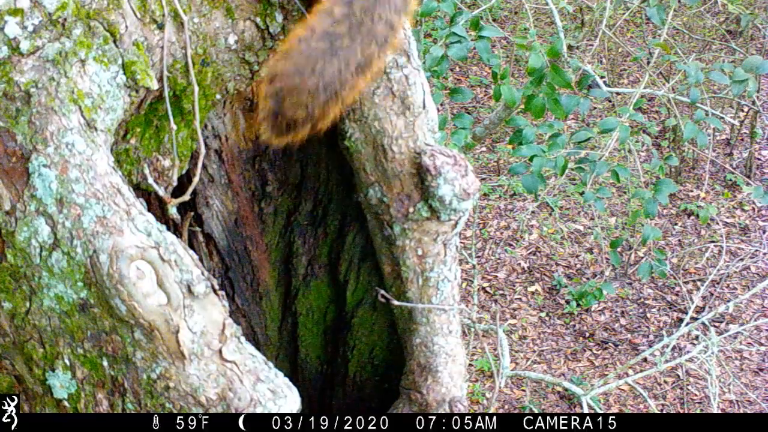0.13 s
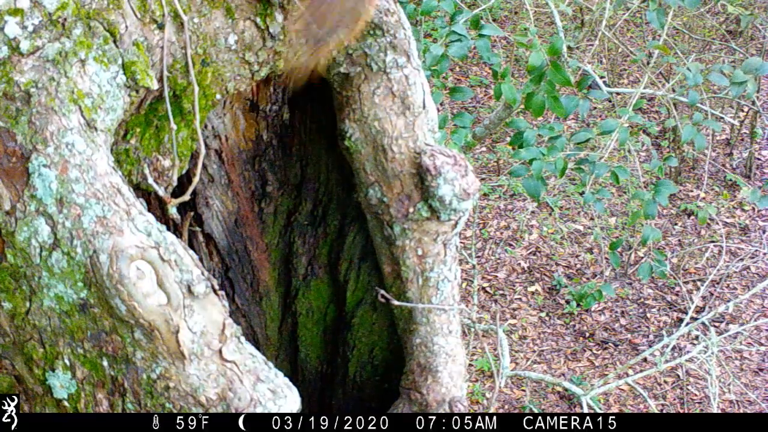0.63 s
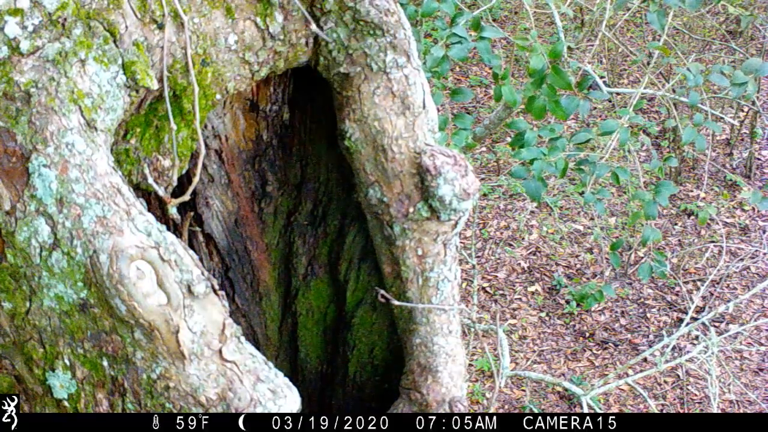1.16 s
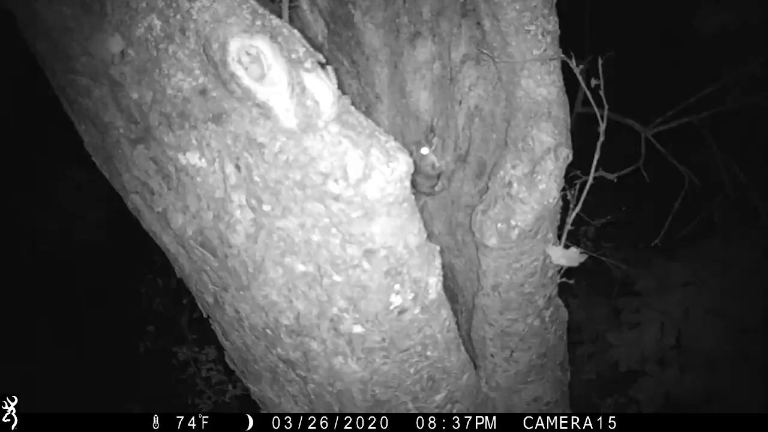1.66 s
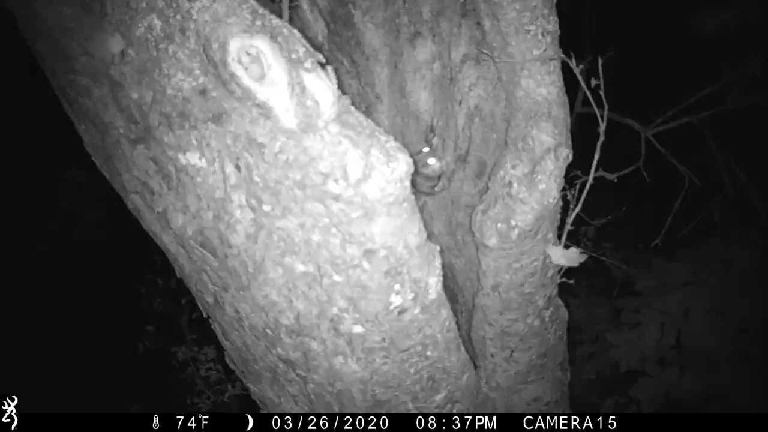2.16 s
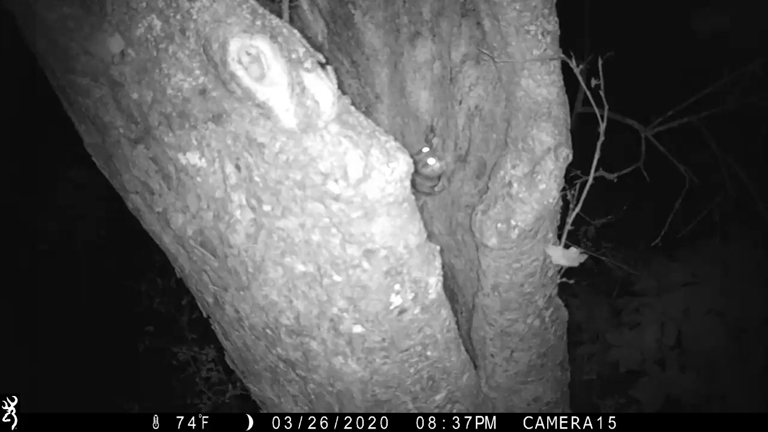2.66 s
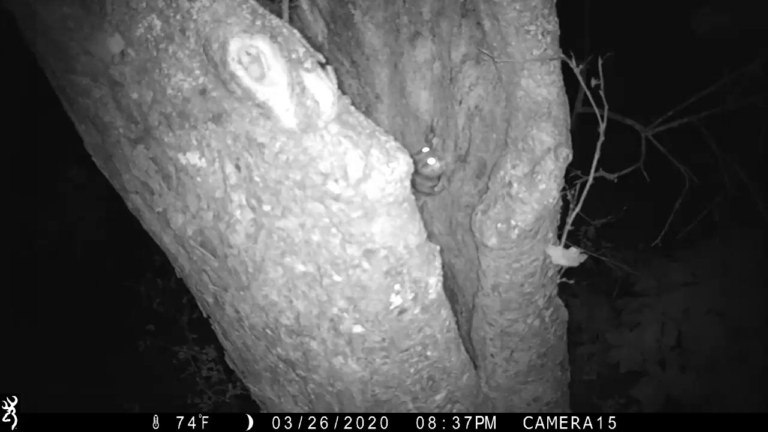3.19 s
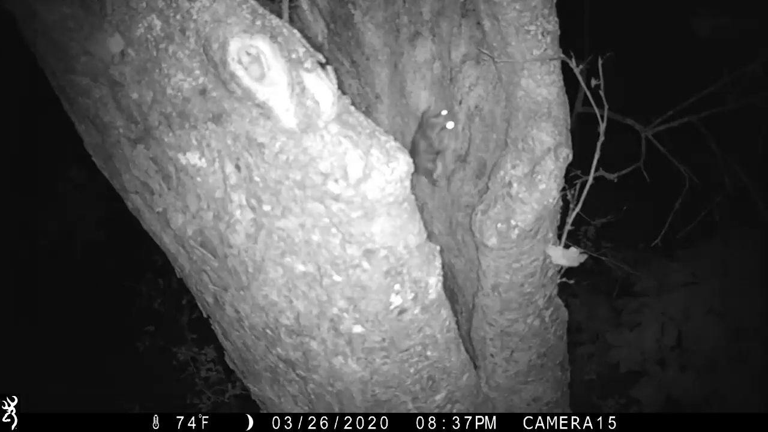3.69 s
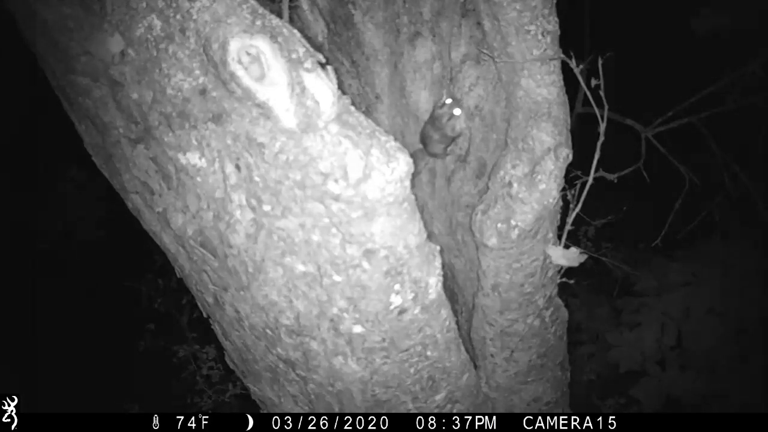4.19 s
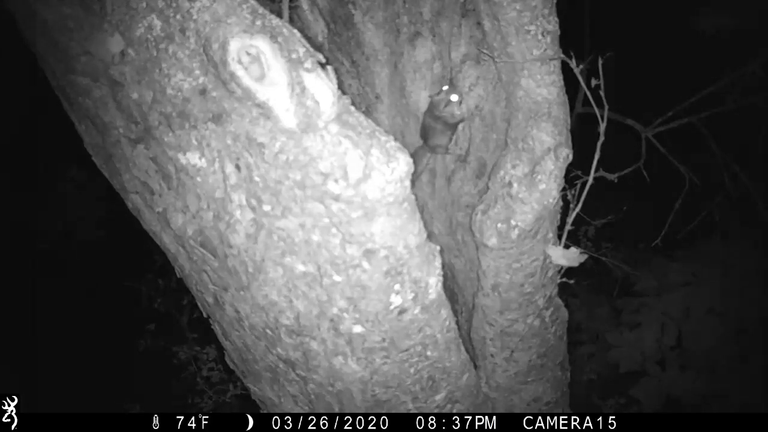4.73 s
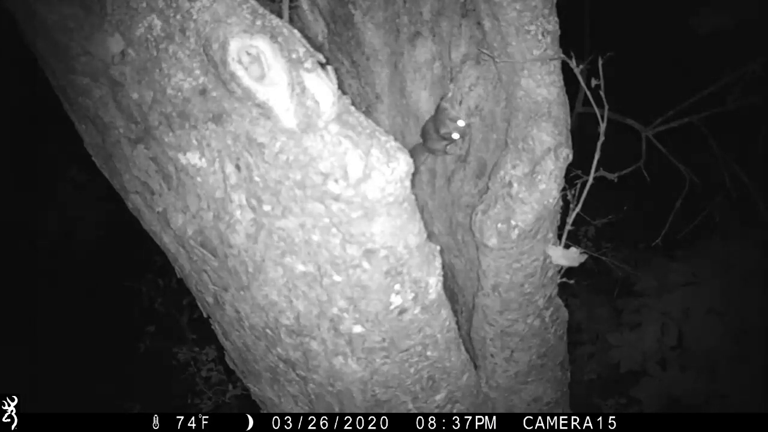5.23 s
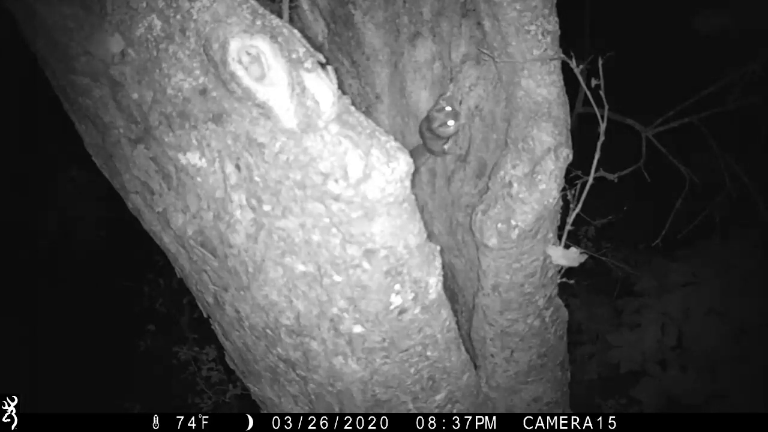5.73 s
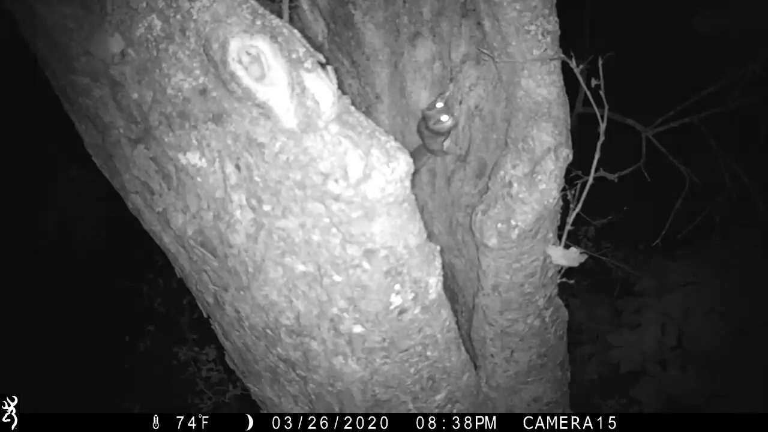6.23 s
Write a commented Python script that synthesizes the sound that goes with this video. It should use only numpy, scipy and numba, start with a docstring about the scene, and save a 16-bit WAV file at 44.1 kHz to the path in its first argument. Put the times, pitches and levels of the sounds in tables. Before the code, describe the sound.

A microphone fixed by a hollow tree picks up crisp claw ticks, woody knocks and one sharp jolt, with small bird whistles and a lone ticking insect behind a quiet buzzing chorus. The scene cuts hard to night: a piercing, steady, trembling cricket drone dominates, masking faint road noise and a distant passing vehicle, with small hollow knocks late on.

```python
"""Morning and night at a tree-trunk camera

A morning scene, then a hard cut to a louder night. Morning: resonant noise throbs as an insect chorus, gliding
sines are far birds, one insect ticks, and a squirrel's claws ring and rustle on bark. Night: a denser cricket
chorus drives the fast limiter, and one vehicle's roar passes. Low knocks ring the hollow trunk by day and
night, by day from landing paws, over far road hum (shaped noise); a jolt pushes the microphone once by day.
Half-rate storage leaves mirror images."""
import sys
import numpy as np
from scipy import signal
from scipy.fft import rfft, irfft
from scipy.io import wavfile
from scipy.ndimage import uniform_filter1d
from numba import njit

SR = 44100
rng = np.random.default_rng(int(sys.argv[2]) if len(sys.argv) > 2 else 0)


def waveform_to_disk(signal):
    """Save audio, clipped to [-1, 1], as 16-bit WAV at the path in sys.argv[1]."""
    frames = np.transpose(np.atleast_2d(signal))
    scaled = np.clip(frames, -1, 1) * 32767
    samples = np.round(scaled).astype(np.int16)
    wavfile.write(sys.argv[1], SR, samples)


def field_ratio(decibels):
    """Amplitude ratio for a level in dB (20 dB per decade); scalars and array-likes work."""
    return 10 ** (np.asarray(decibels, dtype=float) / 20)


N = 280917
T = np.arange(N) / SR  # seconds
HZ = np.arange(N // 2 + 1) * SR / N  # spectrum bins

CUT_S = 1.5545  # morning gives way to night
# All levels below are those before the limiter.
# Wing resonances of each chorus: resonance_hz, width_hz (of one resonator stage), gain_db
DAY_WINGS = [(4020, 490, 1.5), (4202, 630, 2), (4640, 650, 0.5), (4980, 640, -4), (5500, 1300, -21)]
NIGHT_WINGS = [(5565, 666, 3), (5200, 1015, -3.5), (4660, 980, -33)]
DAY_CHORUS_DB = -32.5
NIGHT_CHORUS_DB, CHORUS_SAG_DB_PER_S = -17.5, 0.31  # level at the cut, then its slow fall

# Spectrum of far road hum: frequency_hz, relative_db (per Hz)
DAY_HUM_COLOUR = [(30, -14), (80, -16.5), (200, -6), (600, 1), (1200, 3), (1700, -0.5), (2600, -4.5),
                  (3500, -7), (6000, -29), (7500, -37), (11000, -48)]
NIGHT_HUM_COLOUR = [(30, -11), (100, -10.5), (350, -6), (800, -1.5), (1250, -1), (1700, -5), (2500, -10.5),
                    (3500, -13.5), (6000, -10), (8000, -46), (11000, -23.5)]
DAY_HUM_DB = -37.5
NIGHT_HUM_DB, HUM_SAG_DB_PER_S = -34, 0.33  # level at the cut, then its slow fall

# Fur and bark rustling as the squirrel moves: start_s, length_s, level_db
MOVES = [(.2, .1, -56), (.65, .06, -60), (.84, .08, -57), (1.03, .13, -58), (1.34, .25, -53)]
RUSTLE_FADE_S, RUSTLE_REST_DB = 0.04, -67
# Spectrum of the rustle: frequency_hz, relative_db
RUSTLE_COLOUR = [(1500, -37), (4000, -14), (5600, 7), (7000, -10), (8500, -10), (11000, -32)]

# Notes of two repeated bird songs: start_s (after the song's start), length_s, start_hz, end_hz, relative_db
WARBLE_NOTES = [(0, .04, 2306, 2776, 1.5), (0.067, .045, 2880, 3030, -2.5)]
WHISTLE_NOTES = [(0, 0.044, 3114, 3180, 0), (.055, 0.042, 3180, 3200, -1.5)]
# Repeats of each song: start_s, level_db
WARBLES = [(.09, -43), (.487, -44), (.888, -41.5), (1.25, -57)]
WHISTLES = [(.445, -47), (.915, -45), (1.398, -44.5)]
# Single notes of other birds: start_s, length_s, start_hz, end_hz, level_db
CHIRPS = [(.01, .038, 2730, 2870, -47), (.13, 0.038, 2380, 2720, -42), (.155, 0.033, 2010, 1946, -43),
          (.235, .045, 2740, 2820, -48), (.375, 0.031, 2460, 2480, -47), (.462, .025, 1850, 1950, -49),
          (.49, .03, 2840, 2790, -45), (.8, 0.045, 2860, 2780, -47), (.92, .1, 7200, 7250, -67)]

# Claw ticks on bark: start_s, level_db, pitch_hz
CLAW_TICKS = [(.077, -22.5, 6100), (0.08, -23, 6470), (.105, -35, 6100), (.2205, -26.5, 7000),
              (.226, -34, 6900), (.231, -35, 7040), (.265, -43, 7000), (.546, -48, 7000), (.577, -29, 7000),
              (.625, -44, 7600), (.68, -34, 6300), (.845, -42, 5900), (.884, -43, 6500), (.933, -37, 6900),
              (1.0333, -15, 5100), (1.034, -32, 8500), (1.04, -38, 5200), (1.075, -41, 6000),
              (1.121, -43, 6800), (1.154, -39, 6900), (1.326, -42, 6000), (1.364, -40, 6000),
              (1.378, -33, 5500), (1.386, -33, 5800), (1.3933, -36, 6340), (1.397, -39, 6300),
              (1.4011, -15, 5670), (1.4095, -17, 5470), (1.4115, -20, 5550), (1.4142, -34, 6500),
              (1.439, -36, 6000), (1.449, -39, 7000), (1.475, -26, 5540), (1.501, -47, 7300),
              (1.536, -30, 5700)]
RISE_CYCLES, TICK_KNOCK_GAIN_DB, TICK_KNOCK_HZ = 3.7, -14, 2550
# Spectrum of the claws' grit: frequency_hz, relative_db
GRIT_COLOUR = [(1500, -14), (3500, 0), (6000, 2), (8000, -14), (9000, -22), (11000, -32)]

# Ticks of a lone insect: start_s, level_db
INSECT_TICKS = [(0.1216, -44), (0.3416, -44), (0.4314, -42), (0.5023, -43), (0.5526, -46), (0.6005, -46),
                (0.634, -45), (0.7317, -43), (0.8006, -43), (0.8689, -40), (0.9148, -42), (0.9502, -41),
                (0.9961, -48), (1.066, -42), (1.1618, -49), (1.1982, -53), (1.2984, -48)]

# Low knocks on bark, from landing paws by day: start_s, level_db, contact_hz (the pitch the contact drives
# best)
BARK_KNOCKS = [(.68, -40, 3100), (1.0338, -16, 2250), (1.3933, -26, 2600), (1.402, -23, 2700),
               (1.41, -23, 2700), (1.438, -21.5, 1900), (4.8, -26, 1600), (5.776, -20.5, 1350),
               (5.938, -23, 1900), (5.945, -29, 780)]
# Modes of the hollow trunk: mode_hz, gain_db, t60_s
TRUNK_MODES = [(750, 4, .014), (1340, 2.5, .013), (2210, 0, 0.0096), (2630, 1, .01), (3220, -9, .008)]
CONTACT_OCTAVES = 0.92  # distance from the contact pitch at which the drive falls to 1/e

JOLT_S, JOLT_DB, JOLT_RISE_MS = 1.0341, -16, 0.075  # one hard landing, peak level

PASS_S, PASS_DB, PASS_WIDTH_S = 3.1, -35.5, 0.62  # closest moment, level there, distance over speed
# Spectrum of the vehicle's tyre roar: frequency_hz, relative_db
TYRE_COLOUR = [(500, -18.5), (900, -6.5), (1150, -1.5), (1450, -3), (2200, -34.0)]


def level(x, db):
    """Root-mean-square scaling: bring a sound to a level, fixed or moving."""
    return x * field_ratio(db) / np.sqrt(np.mean(x ** 2))


def walk(rate):
    """Smoothed random process: held chance values, averaged twice, with spread 1."""
    hold = int(SR / rate)
    steps = np.repeat(rng.standard_normal(N // hold + 1), hold)
    smooth = uniform_filter1d(uniform_filter1d(steps, hold), hold)[:N]
    return smooth / smooth.std()


def coloured(x, points):
    """Linear filtering: multiply the spectrum by a gain drawn through the (Hz, dB) points."""
    hz, db = np.transpose(points)
    gain_db = np.interp(np.log(HZ + 1), np.log(hz), db)
    return irfft(rfft(x) * field_ratio(gain_db), N)


def chorus(wings, throb_hz, throb_db, flicker_db, steep):
    """Resonance and amplitude modulation: countless wing strokes blur to noise, each group throbbing in its own time."""
    out = 0
    for hz, width, db in wings:
        wandering_hz = throb_hz * (1 + 0.02784 * walk(6))
        phase = 2 * np.pi * np.cumsum(wandering_hz) / SR + 2 * np.pi * rng.random()
        stroke_db = throb_db * np.sin(phase) + flicker_db * walk(14)
        strokes = rng.standard_normal(N) * field_ratio(stroke_db)
        ring = 1 / (1 + 2j * (HZ - hz) / width) ** steep
        out = out + field_ratio(db) * irfft(rfft(strokes) * ring, N)
    return out


def hum(colour, flutter_db):
    """Incoherent summation: distant traffic blends to smooth noise that swells and flutters."""
    flutter = walk(8.4) + 1.1 * walk(25.16)
    return coloured(rng.standard_normal(N), colour) * field_ratio(flutter_db * flutter)


def moving_db():
    """Power addition: each move swells out of the resting rustle and decays exponentially back."""
    power = field_ratio(RUSTLE_REST_DB) ** 2
    for start, length, db in MOVES:
        outside = np.maximum(np.maximum(start - T, T - start - length), 0)
        power = power + field_ratio(db) ** 2 * np.exp(-2 * outside / RUSTLE_FADE_S)
    return 10 * np.log10(power)


def rustle():
    """Granular friction: dense tiny contacts of very uneven size, bright like the claw ticks."""
    struck = rng.random(N) < 900 / SR  # about 900 grains a second
    grains = struck * field_ratio(4.3 * rng.exponential(size=N)) * rng.standard_normal(N)
    burst = rng.standard_normal(64) * np.exp(-T[:64] / .0004)
    return coloured(signal.fftconvolve(grains, burst)[:N], RUSTLE_COLOUR)


def birds():
    """Frequency modulation and scattering: near-sine notes glide, and the wood returns a short smear."""
    out = np.zeros(N)
    notes = list(CHIRPS)
    for starts, song in ((WARBLES, WARBLE_NOTES), (WHISTLES, WHISTLE_NOTES)):
        for start, db in starts:
            for after, length, start_hz, end_hz, relative_db in song:
                notes.append((start + after, length, start_hz, end_hz, db + relative_db))
    for start, length, start_hz, end_hz, db in notes:
        u = np.arange(int(length * SR)) / (length * SR)
        hz = start_hz + (end_hz - start_hz) * u ** 0.83  # quickest at first
        envelope = np.sqrt(2) * np.sin(np.pi * u) ** 0.51
        i = int(start * SR)
        out[i:i + len(u)] += field_ratio(db) * envelope * np.sin(2 * np.pi * np.cumsum(hz) / SR)
    t = T[:SR // 4]
    smear = level(rng.standard_normal(len(t)) * np.exp(-t / .06), 0) / np.sqrt(len(t))
    return out + field_ratio(-6) * signal.fftconvolve(out, smear)[:N]


def claws():
    """Impulse response: each tick rings the camera case, with bright grit over a faint dull knock of bark."""
    out, scrape, t = np.zeros(N), np.zeros(N), T[:600]
    knock_envelope = t / 0.00029 * np.exp(1 - t / 0.00039)
    knock = field_ratio(TICK_KNOCK_GAIN_DB) * knock_envelope * np.sin(2 * np.pi * TICK_KNOCK_HZ * t)
    for start, db, hz in CLAW_TICKS:
        u = t * hz / RISE_CYCLES  # every tick rises and dies over the same number of cycles
        envelope = u * np.exp(1 - u)
        i = int(start * SR)
        out[i:i + len(t)] += field_ratio(db) * (0.88 * envelope * np.sin(2 * np.pi * hz * t) + knock)
        scrape[i:i + len(t)] += field_ratio(db) * 1.24 * envelope * rng.standard_normal(len(t))
    return out + coloured(scrape, GRIT_COLOUR)


def ticker():
    """Damped resonance: each tick of the lone insect is a short ring of one wing mode."""
    out, t = np.zeros(N), T[:400]
    ring = t / 0.0011 * np.exp(1 - t / 0.0011) * np.sin(2 * np.pi * 5780 * t)
    for start, db in INSECT_TICKS:
        i = int(start * SR)
        out[i:i + len(t)] += field_ratio(db) * ring
    return out


def bark_knocks():
    """Modal excitation: each knock rings the trunk's modes, most those near its contact pitch; by day the
    knocks are landing paws."""
    out, t = np.zeros(N), T[:1200]
    hz, mode_db, t60 = np.transpose(TRUNK_MODES)[:, :, None]
    envelope = (1 - np.exp(-t / 0.00021)) * np.exp(-np.log(1000) * t / t60)
    rings = field_ratio(mode_db) * envelope * np.sin(2 * np.pi * hz * t)
    for start, db, contact_hz in BARK_KNOCKS:
        drive = np.exp(-(np.log2(hz / contact_hz) / CONTACT_OCTAVES) ** 2)
        i = int(start * SR)
        out[i:i + len(t)] += field_ratio(db) * np.sum(drive * rings, axis=0)
    return out


def jolt():
    """Broadband impulse: a short one-sided push on the microphone, heard from bass to treble."""
    u = np.maximum(T - JOLT_S, 0) * 1000 / JOLT_RISE_MS
    return -field_ratio(JOLT_DB) * u * np.exp(1 - u)


def passing_vehicle():
    """Spherical spreading: tyre roar near 1.1 kHz varies in amplitude as 1 / distance."""
    passing_db = PASS_DB - 10 * np.log10(1 + ((T - PASS_S) / PASS_WIDTH_S) ** 2)
    return level(hum(TYRE_COLOUR, flutter_db=1.5), passing_db)


def scene():
    """Superposition: morning and night layers meet at a hard cut, with the contacts on bark added to both."""
    day_chorus = chorus(DAY_WINGS, throb_hz=59.7, throb_db=2.5, flicker_db=0.8, steep=4.15)
    day = level(day_chorus, DAY_CHORUS_DB)
    day = day + level(hum(DAY_HUM_COLOUR, flutter_db=0.53), DAY_HUM_DB)
    day = day + level(rustle(), moving_db()) + birds() + ticker()

    since_cut = T - CUT_S
    night_chorus = chorus(NIGHT_WINGS, throb_hz=60.37, throb_db=3.0, flicker_db=0.4, steep=3.12)
    night_hum = hum(NIGHT_HUM_COLOUR, flutter_db=0.46)
    night = level(night_chorus, NIGHT_CHORUS_DB - CHORUS_SAG_DB_PER_S * since_cut)
    night = night + level(night_hum, NIGHT_HUM_DB - HUM_SAG_DB_PER_S * since_cut)
    night = night + passing_vehicle()

    return (np.where(T < CUT_S, day, night) + claws() + bark_knocks() + jolt())[None]


@njit
def limiter(x, top, attack, release, slope):
    """Gain control by envelope following: gain tracks the rectified wave within a few cycles, so quick swells overshoot."""
    y, envelope = np.empty(len(x)), 0.
    for i in range(len(x)):
        size = abs(x[i])
        envelope += (size - envelope) * (attack if size > envelope else release)
        y[i] = x[i] * min(1., top / (envelope + 1e-9)) ** slope
    return y


def low_pass(x):
    """Removes everything above the highest recorded frequency."""
    return signal.sosfilt(signal.butter(12, 17070, fs=SR, output="sos"), x)


def record(dry):
    """Sampling and imaging: preamp hiss, half-rate sampling, a fast limiter, then straight-line stretching."""
    x = dry[0] + field_ratio(-58) * rng.standard_normal(N)
    lowpass = signal.butter(4, 10000, fs=SR, output="sos")
    half = signal.sosfilt(lowpass, x)[::2]
    # the gain ripples at twice the chorus pitch and mixes it with the road hum into a grainy hiss near 10 kHz
    half = limiter(half, top=field_ratio(-21.0), attack=0.47, release=0.042, slope=0.69)
    # by day a faint buzz at the top of the stored band: alternating signs under a 63.5 Hz cosine
    k = np.arange(len(half))
    buzz = (-1.) ** k * np.cos(2 * np.pi * 63.5 * T[::2])
    half = half + field_ratio(-75) * (T[::2] < CUT_S) * buzz
    # straight-line stretching mirrors everything about a quarter of the sample rate
    x = np.interp(np.arange(N), 2 * k, half)
    mix = coloured(x, [(20, 0), (15730, 0), (15860, -70)])  # steep treble cut
    return low_pass(mix[None])


dry = scene()
out = record(dry)
waveform_to_disk(out)
```